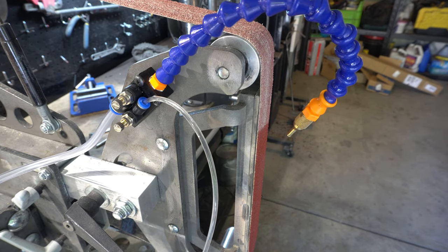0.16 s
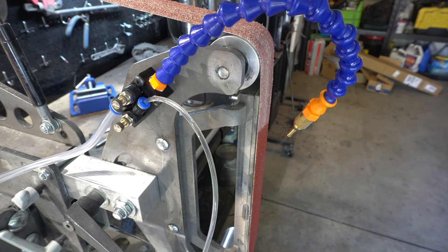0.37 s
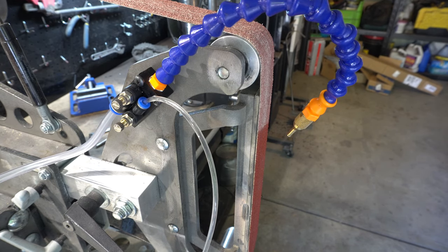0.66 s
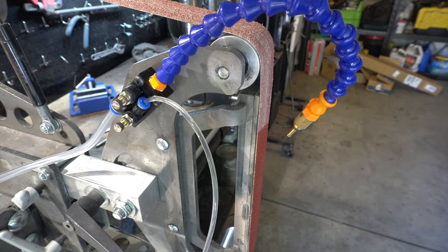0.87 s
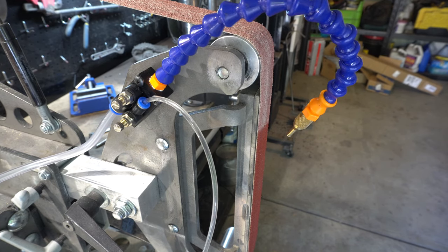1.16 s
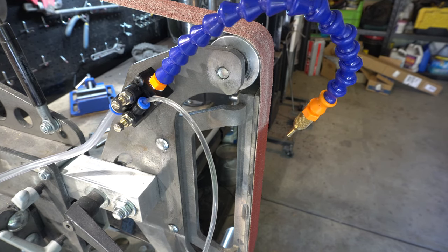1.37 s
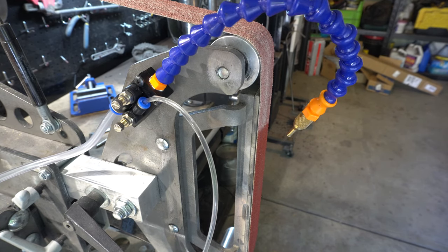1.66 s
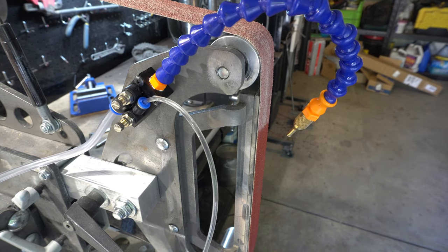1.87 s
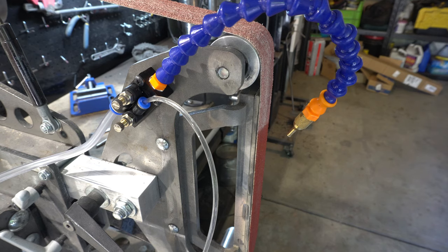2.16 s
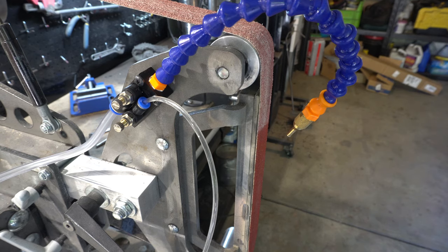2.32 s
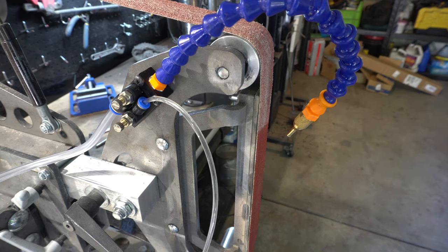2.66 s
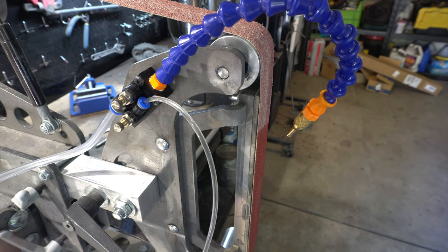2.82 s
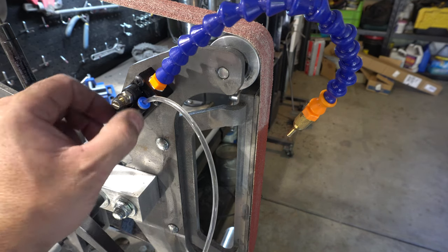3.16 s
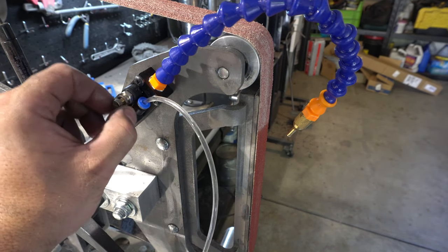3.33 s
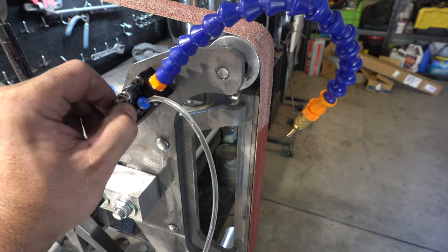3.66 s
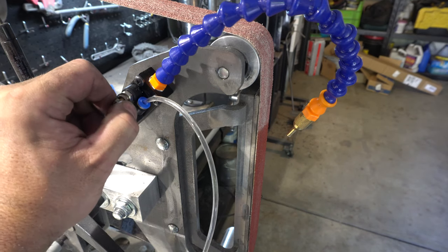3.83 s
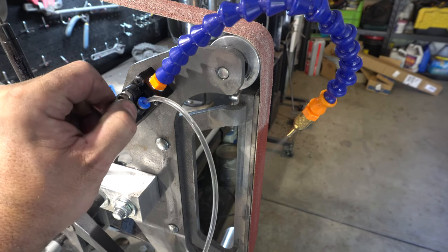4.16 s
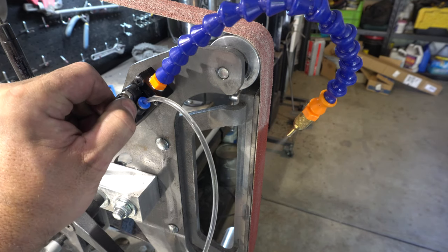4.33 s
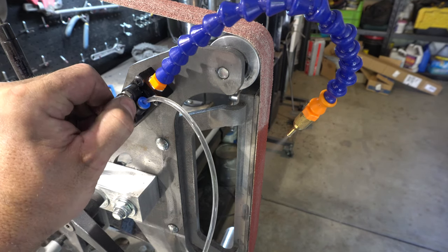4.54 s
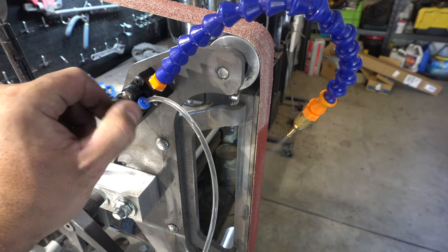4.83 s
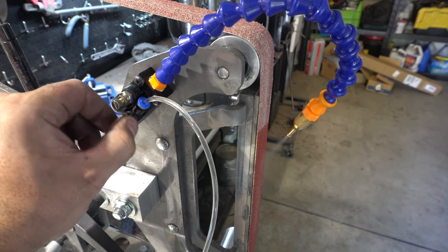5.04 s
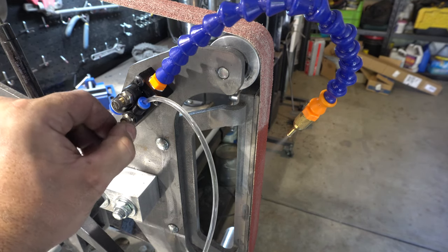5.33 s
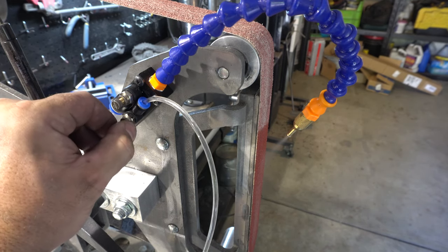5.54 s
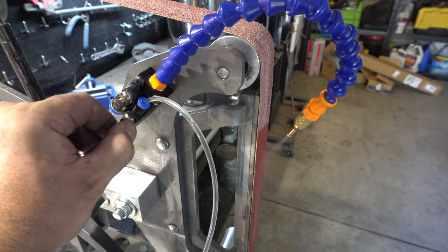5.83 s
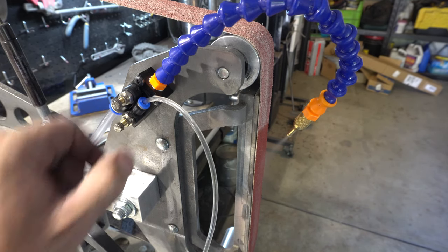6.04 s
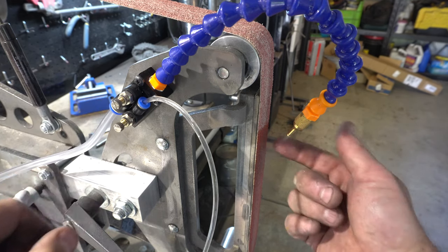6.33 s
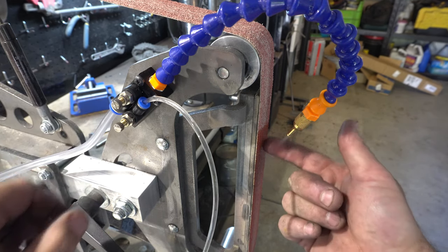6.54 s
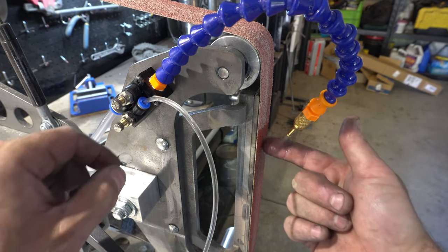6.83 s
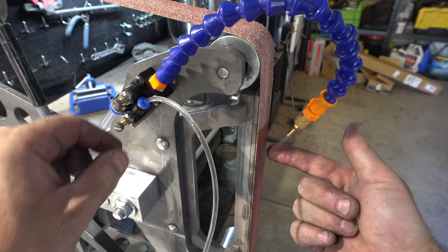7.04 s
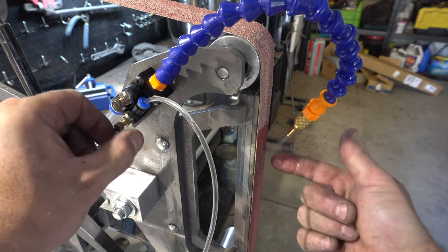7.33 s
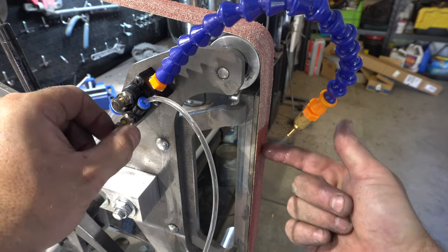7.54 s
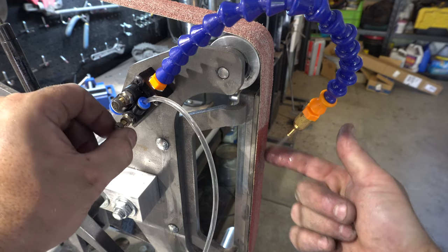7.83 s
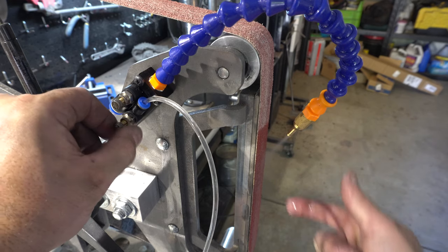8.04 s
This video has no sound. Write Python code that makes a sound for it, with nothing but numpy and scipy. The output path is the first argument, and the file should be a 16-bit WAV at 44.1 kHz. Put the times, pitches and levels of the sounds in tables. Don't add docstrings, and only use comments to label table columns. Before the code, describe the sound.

A steady bright high hiss of compressed air and fine mist close by, later breaking into rough lumpy roars as a finger enters the jet.

```python
import sys
import numpy as np
from scipy import signal
from scipy.fft import rfft, irfft, next_fast_len
from scipy.io import wavfile
from scipy.ndimage import map_coordinates

SR = 44100
rng = np.random.default_rng(int(sys.argv[2]) if len(sys.argv) > 2 else 0)


def natural_amplitude(level_db):
    exponent = np.asarray(level_db, float) / 20
    return 10 ** exponent


def store_wav(level_fs):
    pcm = np.round(np.clip(np.atleast_2d(level_fs), -1, 1) * 32767)
    wavfile.write(sys.argv[1], SR, pcm.T.astype(np.int16))


N = 360861
PADDED = next_fast_len(N + 4096)
FREQ = np.maximum(np.fft.rfftfreq(PADDED, 1 / SR), 1)

# pitch_hz, level_db (per Hz)
DEEP_COLOUR = [(8.8, -38), (15, 3), (32, 1), (75, -0.5), (97, 2.5), (107, -3.5), (130, 1.5), (162, -10.5),
               (220, -7.5), (290, -18), (480, -120)]
NEAR_COLOUR = [(110, -31), (190, -12), (240, -3.5), (262, -3), (291, 0), (325, -4), (371, -9), (400, -7.5),
               (520, -14.5), (800, -10), (1100, -58)]
# time_s, level_db
TRAFFIC = [(0, -59), (.5, -53), (3.0, -52), (3.3, -57), (3.7, -52), (4.2, -59.5), (5.5, -59), (6.9, -62),
           (7.9, -61)]
# middle_s, length_s, level_db
PASSES = [(3.2, 0.56, -53), (3.47, 0.91, -50.5), (5.07, 0.53, -60), (6.17, 0.91, -55.5)]
# middle_s, length_s, loss_db
LULLS = [(5.8, .4, 3), (6.84, .3, 2), (7.12, .4, 6), (7.7, .25, 3)]
# middle_s, length_s, level_db
DRONE_SWELLS = [(.35, 1.2, -58), (1.7, .8, -60), (2.35, 0.95, -57), (3.0, 0.47, -58), (3.5, 1.05, -52),
                (4.0, 0.92, -55), (4.45, .5, -59), (5.1, 0.27, -64), (7.6, .7, -61), (8.0, .8, -59)]
# middle_s, length_s, level_db
THUD = [(3.03, .3, -52)]
# pitch_hz, level_db (per Hz)
SHOP_COLOUR = [(190, -36), (330, -2.5), (381, -1), (409, -4.5), (565, -2.5), (800, -4), (1040, -36),
               (1760, -120)]
# middle_s, length_s, level_db
WAFTS = [(2.05, .06, -54), (2.11, 0.2, -53.5), (7.47, 0.38, -54), (7.74, .15, -55), (7.96, 0.23, -51.5)]
# pitch_hz, level_db (per Hz)
WAFT_COLOUR = [(150, -19), (280, -5.5), (410, 1.5), (520, -6), (700, -4), (900, -30)]

# time_s, position (0 away, 1 at the valve, 2-4 finger poses, 5 withdrawn)
HANDS = [(0, 0), (2.9, 0), (3.3, 1), (6.2, 1), (6.3, 2), (7.03, 2), (7.09, 3), (7.5, 3), (7.56, 4),
         (7.94, 4), (7.99, 5), (8.18, 5)]
# time_s, opening (0-1 above idle)
VALVE = [(0, 0.75), (.13, 0.04), (3.68, 0.12), (4.05, 0.84), (4.4, 0.82), (4.9, 0.9), (8.18, 0.74)]
# start_s, roar_db, turn (about -2 to 1)
TOUCHES = [(6.27, -52, 1), (6.41, -43.5, 0.31), (6.55, -43, 0.76), (7.04, -43.5, -1.4), (7.27, -39.5, -1.6),
           (7.41, -45, .2), (7.5, -41.5, -0.069), (7.67, -42.5, -1.8)]
# middle_s, whistle_db
CROSSINGS = [(3.08, 1.4), (3.8, 2.3), (6.35, 7.5), (6.54, 7.7), (6.95, 3.3), (7.63, 2.7)]
# middle_s, length_s, loss_db
SHADES = [
    (7.455, 0.43, 7),
    (7.98, .16, 6),
]
# middle_s, length_s, level_db
PUFFS = [(1.01, .05, -46), (2.05, .05, -44), (2.1, 0.16, -48.5), (3.26, 1, -49.5), (3.94, 0.092, -47),
         (5.6, 0.35, -47), (6.29, .06, -41), (6.46, 0.11, -37), (7.11, .08, -39), (7.545, 0.088, -39),
         (7.77, 0.11, -36.5), (7.925, 0.11, -34.5), (8.06, 0.49, -47.5)]
# pitch_hz, level_db (per Hz)
ROAR_COLOUR = [(190, -61), (330, -17.5), (403, -13), (495, -19.5), (560, -25), (746, -10), (886, -4.5),
               (1190, -7), (1290, -3), (1470, -11.5), (1570, -4.5), (1700, 0.5), (2210, -5.5), (3740, -120)]
# time_s, level_db
SIZZLE = [
    (7.31, -60),
    (7.37, -34),
    (7.44, -35),
    (7.54, -31),
    (7.62, -60),
]
# pitch_hz, level_db (per Hz)
SIZZLE_COLOUR = [(4800, -16), (5300, -3), (5500, -8), (5750, -7), (6300, -25)]

JET_ZONES_HZ = [1990, 4800, 9700, 15000]
# body_db, flow_db, edge_db, top_db
VALVE_GAIN_DB = [3.1, 1.2, 3.86, 1.7]
TOUCH_GAIN_DB = [2.5, -3, 1.5, -2.1]
TURN_GAIN_DB = [0.83, -0.12, -0.5, 1]
CROSS_GAIN_DB = [-0.0014, 1, -0.38, 0.34]
SHADE_GAIN_DB = [-0.94, -0.042, -0.16, -0.018]
# pitch_hz, level_db (per Hz)
JET_COLOUR = [(410, -49), (700, -33), (1510, -16.5), (1760, -12.5), (1980, -7.5), (2890, -4.5), (3160, -3),
              (3560, -4.5), (3840, -2.5), (6220, -2), (7270, -2.5), (10100, 1), (12400, 0), (15100, 2),
              (15600, -7)]
# pitch_hz, half_width_hz, share
NOZZLE = [(3620, 10.5, 0.65), (4300, 18, 0.51), (2980, 15, 0.51), (3240, 20, 0.46), (4100, 23, 0.041),
          (4710, 17, 0.4), (6550, 21, -0.51), (6100, 24, 0.000015), (6760, 25, 0.51), (8140, 36, 0.29),
          (12300, 50, -.15), (12800, 70, -0.28)]
# pitch_hz, left_minus_right_db
JET_SIDE = [(60, 0.0), (110, 0.0), (200, 0.0), (380, -4), (700, -3), (1290, 5), (2380, -4), (4400, -1.5),
            (8120, 0), (15000, -2)]
# away_db, at_valve_db, in_jet_db
LEAN_DB = [-1, -0.5, -0.9]
# delay_ms, left_share, right_share
ECHOES_FREE = [(0.312, -0.05, -0.02), (0.386, -0.04, -0.04), (0.43, -0.02, -0.04), (0.734, 0.04, 0.01),
               (0.782, 0.03, 0.02), (1.194, -0.03, -0.01), (1.44, 0.01, 0.03), (1.524, -0.03, -0.02),
               (2.74, 0.05, 0.04), (2.782, 0.11, 0.11), (2.862, -0.04, -0.05), (2.95, 0.04, 0.05),
               (3.102, -0.0, -0.03), (3.132, -0.05, -0.02), (3.174, -0.02, -0.03), (3.686, 0.04, 0.03),
               (3.756, 0.03, 0.01), (4.964, 0.03, 0.03), (5.172, 0.03, 0.01), (5.752, 0.02, 0.03),
               (6.046, 0.04, 0.03), (6.408, -0.03, -0.02), (6.472, 0.02, 0.03), (7.47, 0.03, 0.03)]
ECHOES_VALVE = [(0.376, -0.02, -0.06), (0.416, 0.0, -0.07), (0.502, 0.02, -0.03), (0.938, -0.04, -0.02),
                (1.078, 0.05, 0.05), (1.134, 0.04, 0.05), (1.22, -0.05, -0.02), (1.436, 0.02, 0.03),
                (1.48, -0.04, -0.01), (1.524, -0.07, -0.04), (1.57, -0.04, -0.03), (1.874, 0.04, 0.02),
                (2.744, 0.05, 0.04), (2.784, 0.12, 0.12), (2.862, -0.02, -0.04), (2.962, 0.03, 0.04),
                (3.12, -0.03, -0.05), (3.512, -0.03, -0.03), (4.96, 0.04, 0.04), (5.748, 0.02, 0.03),
                (6.046, 0.03, 0.02), (6.644, -0.02, -0.03), (6.758, -0.03, -0.03), (7.466, 0.04, 0.04)]
ECHOES_FINGER = [
    [(0.2, 0.02, -0.06), (0.232, -0.05, 0.06), (0.28, 0.14, 0.19), (0.364, -0.07, 0.04), (0.454, 0.0, 0.07),
     (0.824, -0.06, -0.02), (1.088, 0.04, 0.04), (1.184, -0.05, -0.04), (1.37, 0.07, 0.05),
     (1.518, -0.06, 0.01), (1.596, 0.05, 0.04), (2.716, 0.03, 0.05)],
    [(0.2, 0.1, 0.06), (0.288, 0.08, 0.16), (0.328, -0.02, 0.06), (0.536, 0.04, 0.08), (0.584, 0.02, 0.07),
     (0.912, 0.07, 0.04), (1.074, 0.08, 0.04), (1.186, -0.09, -0.08), (1.24, -0.06, -0.07),
     (1.412, -0.04, -0.06), (1.596, 0.05, 0.02), (1.644, 0.06, 0.03)],
    [(0.284, 0.16, 0.22), (0.32, 0.03, 0.09), (0.466, 0.06, 0.09), (0.526, 0.05, 0.05), (0.578, 0.07, 0.1),
     (0.936, 0.05, 0.05), (1.094, 0.06, 0.04), (1.19, -0.05, -0.04), (1.24, -0.05, -0.03),
     (1.492, -0.06, -0.03), (2.504, 0.04, 0.04), (2.868, -0.04, -0.05)],
]
# pitch_hz, common_share, right_phase_rad
PORTS_FREE = [(4130, 0.99, -0.0), (7410, 0.67, 0.3), (8440, 0.55, 1.2), (8960, 0.61, 0.8),
              (10850, 0.65, 1.4), (11890, 0.49, 1.5), (12400, 0.44, 1.8), (13440, 0.52, 1.1),
              (13780, 0.66, 1.1), (14300, 0.63, 1.6), (14470, 0.65, 1.5), (15160, 0.72, 1.9),
              (15680, 0.68, 2.0)]
PORTS_VALVE = [(4130, .96, 0), (5700, .55, .8), (6400, .65, -.1), (6900, .75, 0), (7750, .5, .6),
               (8100, .24, 2.1), (8600, .51, 1), (9900, .65, .7), (10500, .68, 1.7), (11700, .55, 1.4),
               (12350, .5, 1.6), (13300, .65, .6), (14200, .55, 1.8), (15000, .65, 2.1)]
PORTS_FINGER = [(4130, 0.76, -0.1), (5340, 0.73, 0.2), (5510, 0.56, 0.2), (9650, 0.62, 1.1),
                (10510, 0.72, 1.4), (12060, 0.46, 1.5), (12750, 0.45, 1.4), (13260, 0.37, 1.4),
                (13440, 0.31, 1.2), (13950, 0.48, 1.2), (15160, 0.55, 1.7), (15500, 0.57, 2.0),
                (15680, 0.54, 1.9)]
# pitch_hz, width_hz, mean_depth (0-1)
FLICKER_NOTCHES = [(5700, 120, 0.12), (7070, 120, 0.16), (8200, 110, 0.4), (11800, 170, 0.16),
                   (12600, 200, 0.3), (14400, 150, 0.3), (15300, 250, 0.15)]
# middle_s, pitch_hz, length_s, width_hz, share
DROPOUTS = [(1.5, 12600, 3.6, 1400, .45), (3.3, 7900, 0.44, 700, 0.3), (3.5, 12500, 1.0, 800, 0.43),
            (4.2, 12550, .2, 500, .6), (4.4, 12600, 1.1, 500, .6), (4.75, 14700, .1, 500, .8),
            (4.9, 5800, 1.2, 600, 0.36), (5.5, 12200, 1.3, 400, .6), (5.6, 13300, 1.8, 500, .4),
            (5.86, 12250, .12, 500, .6), (5.88, 15200, .2, 400, .6), (6.18, 12700, .08, 600, .7),
            (6.36, 14700, .12, 900, 1), (6.34, 12300, .14, 400, 1), (6.352, 7950, 0.22, 1000, 0.45),
            (6.44, 13200, .14, 1500, .6), (6.7, 12650, 0.3, 400, .8), (6.73, 5700, .2, 500, 0.53),
            (6.73, 4960, .12, 400, .6), (6.92, 8700, .3, 800, .6), (7.07, 12700, .1, 700, 1),
            (7.083, 5700, .14, 600, .7), (7.11, 14500, .14, 600, 1), (7.16, 15500, .12, 900, 1),
            (7.31, 4950, .12, 500, .9), (7.36, 11500, .08, 900, 1), (7.31, 12500, .1, 700, .6),
            (7.178, 5500, .1, 600, .7), (5.3, 4800, 1.6, 300, .3), (8.05, 7000, .2, 1200, .4),
            (7.42, 10200, .12, 900, .5), (7.45, 11700, .08, 800, 1), (7.46, 12900, .12, 400, .9),
            (7.45, 15700, .1, 500, 1), (7.5, 8000, 0.13, 400, .6), (7.63, 5700, .16, 900, 0.55),
            (7.8, 13200, .3, 1500, .5), (7.95, 5900, 0.23, 500, 0.46), (8.05, 12700, .25, 900, .5)]
# middle_s, pitch_hz, length_s, width_hz, share
GLINTS = [(.05, 5500, 0.35, 2500, .3), (3.4, 15200, 1.2, 1200, .3), (7.4, 12400, .1, 500, .8),
          (7.95, 5400, .1, 500, .5), (7.8, 15600, .2, 400, .6), (4.45, 13400, .4, 400, .3),
          (5.4, 3300, 0.45, 800, .3), (4.3, 3625, 0.83, 80, 0.54), (5.6, 3625, 0.86, 80, 0.55),
          (7.2, 3640, .5, 100, .5), (7.68, 3625, .3, 100, .5), (4.4, 2200, .4, 700, .3),
          (4.4, 9800, .9, 1200, .3), (5.7, 10300, 1.1, 700, .3), (5.8, 14700, .5, 400, .5),
          (6.35, 5400, 0.09, 500, 0.83), (6.48, 10400, .2, 700, 0.61), (6.8, 13800, .55, 900, .6),
          (7.0, 10800, .14, 500, .7), (7.2, 10300, .4, 1200, .5), (7.33, 15000, .12, 500, .7),
          (7.398, 6500, .08, 400, 0.95), (7.47, 14600, .16, 600, .9), (7.53, 6500, .1, 500, 1),
          (7.65, 12400, .3, 900, .4), (7.77, 10700, .36, 500, 0.5), (7.8, 6500, .14, 400, .6)]
# middle_s, pitch_hz, length_s
NULLS = [(3.18, 12400, .08), (3.65, 8150, .06), (4.2, 12550, .1), (4.75, 14700, .07), (5.56, 12250, .07),
         (5.86, 12250, .08), (5.88, 15200, .1), (6.18, 12500, .06), (6.345, 12300, .08),
         (6.355, 14650, .07), (6.54, 11750, .07), (6.63, 12550, .07), (6.73, 12600, .06), (7.07, 5700, .06),
         (7.075, 12600, .06), (7.11, 14550, .08), (7.155, 15400, .06), (7.32, 4950, .07),
         (7.36, 11700, .07), (7.455, 11700, .07), (7.5, 7950, .08), (7.77, 12250, .07)]


def rms_one(x):
    return x / np.sqrt(np.mean(x ** 2) + 1e-20)


def in_time(rows):
    s, value = np.transpose(rows)
    return np.interp(np.arange(N) / SR, s, value)


def at_hz(points, hz):
    pitch_hz, level = np.transpose(points)
    return np.interp(np.log(hz), np.log(pitch_hz), level)


def drift(rate_hz):
    r = np.exp(-2 * np.pi * rate_hz * 40 / SR)
    sparse = rng.standard_normal(N // 40 + 2002)
    slow = signal.lfilter([1], [1, -2 * r, r * r], sparse)[2000:]
    return np.interp(np.arange(N) / 40, np.arange(len(slow)), rms_one(slow))


def bump(middle_s, length_s):
    first = max(int((middle_s - length_s / 2) * SR) + 1, 0)
    last = min(int((middle_s + length_s / 2) * SR), N)
    inside = np.arange(first, last)
    out = np.zeros(N)
    out[inside] = np.cos(np.pi * (inside / SR - middle_s) / length_s) ** 2
    return out


def swells(rows, rest):
    return np.sqrt(rest ** 2 + sum((natural_amplitude(db) * bump(s, length)) ** 2 for s, length, db in rows))


def coloured(spectrum, alike):
    inside = (FREQ > spectrum[0][0]) & (FREQ < spectrum[-1][0])
    white = rng.standard_normal((2, len(FREQ))) + 1j * rng.standard_normal((2, len(FREQ)))
    mid, side = irfft(white * natural_amplitude(at_hz(spectrum, FREQ)) * inside, PADDED)[:, :N]
    return rms_one(np.sqrt(1 + alike) * mid + np.sqrt(1 - alike) * side * [[1], [-1]])


def resonance(x, hz, width_hz):
    r = np.exp(-np.pi * width_hz / SR)
    poles = [1, -2 * r * np.cos(2 * np.pi * hz / SR), r * r]
    return signal.lfilter([(1 - r * r) / 2, 0, (r * r - 1) / 2], poles, x)


def far_drone():
    drone = 0
    for hz, db in [(64.5, 0), (88.4, -6.5)]:
        phase = 2 * np.pi * np.cumsum(hz + 0.3 * drift(1.5)) / SR
        drone = drone + natural_amplitude(db) * np.sqrt(2) * np.sin(phase)
    return swells(DRONE_SWELLS, natural_amplitude(-67.5)) * drone


def street():
    deep = natural_amplitude(in_time(TRAFFIC) - 2.5) * coloured(DEEP_COLOUR, alike=0.985)
    near = swells(PASSES, natural_amplitude(-63.5)) * coloured(NEAR_COLOUR, alike=0.88)
    lull = natural_amplitude(-sum(db * bump(s, length) for s, length, db in LULLS))
    return lull * (deep + near)


def far_thud():
    return swells(THUD, 0) * np.sqrt(2) * np.sin(2 * np.pi * 30 * np.arange(N) / SR)


def shop_air():
    return natural_amplitude(-61) * coloured(SHOP_COLOUR, alike=0.83)


def wafts():
    return swells(WAFTS, 0) * coloured(WAFT_COLOUR, alike=0.93)


def poses_held(values):
    t = np.arange(N) / SR
    starts_s = [row[0] for row in TOUCHES] + [7.955]
    ramps_s = [0.042] * len(TOUCHES) + [0.015]
    steps = np.diff(np.concatenate([[0], values, [0]]))
    return sum(step * np.clip((t - s) / ramp + 0.5, 0, 1)
               for s, step, ramp in zip(starts_s, steps, ramps_s))


def finger_roar():
    idle = natural_amplitude(-57 + 4 * in_time(VALVE))
    steady = idle + poses_held([natural_amplitude(db) for _, db, _ in TOUCHES])
    return swells(PUFFS, steady) * natural_amplitude(1.04 * drift(3.2)) * coloured(ROAR_COLOUR, alike=0.98)


def sizzle():
    return natural_amplitude(in_time(SIZZLE)) * coloured(SIZZLE_COLOUR, alike=0.63)


def jet_zones():
    touch = poses_held(np.ones(len(TOUCHES)))
    turn = poses_held([angle for _, _, angle in TOUCHES])
    cross = sum(db * bump(s, 0.14) for s, db in CROSSINGS)
    shade = sum(db * bump(s, length) for s, length, db in SHADES)
    gains = np.transpose([VALVE_GAIN_DB, TOUCH_GAIN_DB, TURN_GAIN_DB, CROSS_GAIN_DB, SHADE_GAIN_DB])
    zones = gains @ np.array([in_time(VALVE), touch, turn, cross, shade])
    return zones - zones.mean(axis=1, keepdims=True)


def turbulence(sputter_db, patchy_db):
    zones = jet_zones()
    together = sputter_db * (drift(39) + 0.5 * drift(36))
    spectrum = rfft(rng.standard_normal((2, N)), PADDED)
    out = 0
    for centre in np.log2(700) + np.arange(0, 5, 0.5):
        window = np.cos(np.pi * np.clip(np.log2(FREQ) - centre, -0.5, 0.5)) ** 2
        shares = np.array([np.interp(centre, np.log2(JET_ZONES_HZ), row) for row in np.eye(4)])
        gain = natural_amplitude(shares @ zones + together + patchy_db * drift(11))
        out = out + gain * irfft(spectrum * window, PADDED)[:, :N]
    return out


def clutter_echoes():
    t = np.arange(4096) / SR
    clutter = rng.standard_normal(4096) * np.exp(-t / 0.017) * (t > 0.008)
    return natural_amplitude(-14) * rfft(clutter / np.sqrt(np.sum(clutter ** 2)), PADDED)


def echoes(table, scatter):
    taps = np.zeros((2, PADDED // 16), complex)
    grid = np.linspace(0, SR / 2, taps.shape[1])
    for ms, left, right in table:
        taps += np.outer([left, right], np.exp(-2j * np.pi * grid * ms / 1000))
    returned = at_hz([(2500, 0.85), (6000, 1.15), (14000, 0.89)], FREQ)
    return 1 + returned * ([np.interp(FREQ, grid, side) for side in taps] + scatter)


def agreement(table, closeness, most):
    hz, share, phase = np.transpose(table)
    common = np.interp(FREQ, hz, np.minimum(closeness * share, most) * np.exp(1j * phase))
    return common / np.maximum(abs(common) / 0.995, 1)


def restless_hand(x, position):
    share = np.interp(position, [0, 1, 2], [0.03, 0.12, 0.2])
    out = []
    for port in x:
        lag = (0.0011 + 2.5e-5 * drift(3)) * SR
        echo = map_coordinates(port, [np.arange(N) - lag], order=3)
        out.append((port + share * echo) / np.sqrt(1 + share ** 2))
    return np.array(out)


def flicker(x, position):
    near = np.interp(position, [0, 1, 2], [0.5, 1, 1.3])
    out = x
    for hz, width, depth in FLICKER_NOTCHES:
        share = np.clip(near * depth * (0.5 + drift(6.5)), 0, 1)
        out = out - share * resonance(x, hz, width)
    return out


def dropouts(x):
    out = x.copy()
    for sign, rows in [(-0.55, DROPOUTS), (0.54, GLINTS)]:
        for s, hz, length, width, share in rows:
            part = slice(max(int((s - length / 2) * SR), 0), int((s + length / 2) * SR))
            band = resonance(out[:, part].mean(axis=0), hz, width)
            from_middle_s = (np.arange(len(band)) + part.start) / SR - s
            fade = np.sqrt(abs(np.cos(np.pi * from_middle_s / length)))
            out[:, part] += sign * np.clip(share, 0, 1) * fade * band
    return out


def nulls(x):
    out = x.copy()
    for s, hz, length in NULLS:
        part = slice(int((s - length) * SR), int((s + length) * SR))
        edges = signal.butter(2, [hz - 150, hz + 150], "band", fs=SR, output="sos")
        band = signal.sosfiltfilt(edges, out[:, part].mean(axis=0))
        phase = np.linspace(-1, 1, len(band))
        out[:, part] -= np.clip(3 - 4 * abs(phase), 0, 1) * band
    return out


def jet():
    common, apart = turbulence(sputter_db=0.45, patchy_db=0.37)
    colour = natural_amplitude(at_hz(JET_COLOUR, np.minimum(FREQ, 15050)))
    colour = colour * (1 + sum(share / (1 + ((FREQ - hz) / width) ** 2) for hz, width, share in NOZZLE))
    lean = natural_amplitude(at_hz(JET_SIDE, FREQ) / 2)
    left, other = colour * rfft([common, apart], PADDED)
    scatter = clutter_echoes()
    position = in_time(HANDS)
    poses = zip([ECHOES_FREE, ECHOES_VALVE] + list(ECHOES_FINGER),
                [PORTS_FREE, PORTS_VALVE] + 3 * [PORTS_FINGER])
    out = 0
    for k, (table, ports) in enumerate(poses):
        alike = agreement(ports, closeness=1.13, most=0.9)
        right = alike * left + np.sqrt(1 - abs(alike) ** 2) * other
        heard = irfft([left * lean, right / lean] * echoes(table, scatter), PADDED)[:, :N]
        weight = np.clip(1 - abs(position - k), 0, 1)
        if k == 1:
            weight = weight + np.clip(position - 4, 0, 1)
        out = out + weight * heard
    out = flicker(restless_hand(out, position), position)
    out = nulls(dropouts(out))
    pan_db = np.interp(np.where(position > 4, 1, position), [0, 1, 2], LEAN_DB)
    return natural_amplitude(-19) * rms_one(out) * natural_amplitude(np.outer([0.5, -0.5], pan_db))


def scene():
    background = far_drone() + street() + far_thud() + shop_air()
    return background + wafts() + finger_roar() + sizzle() + jet()


def roll_off(x):
    return signal.sosfilt(signal.butter(12, 15840, fs=SR, output="sos"), x)


def record(dry):
    return roll_off(dry)


dry = scene()
out = record(dry)
store_wav(out)
```